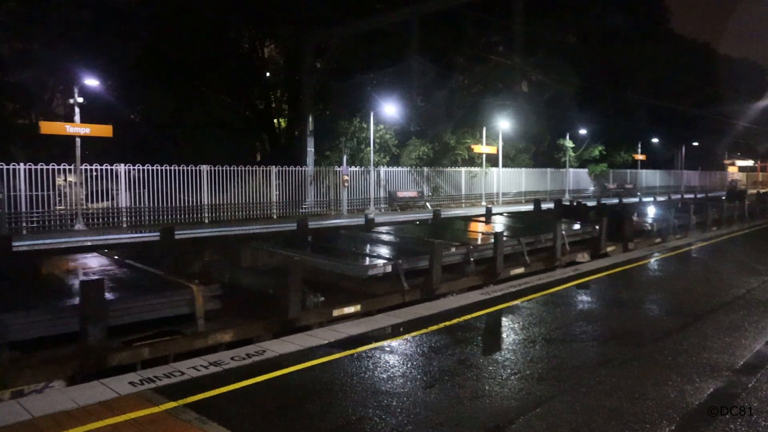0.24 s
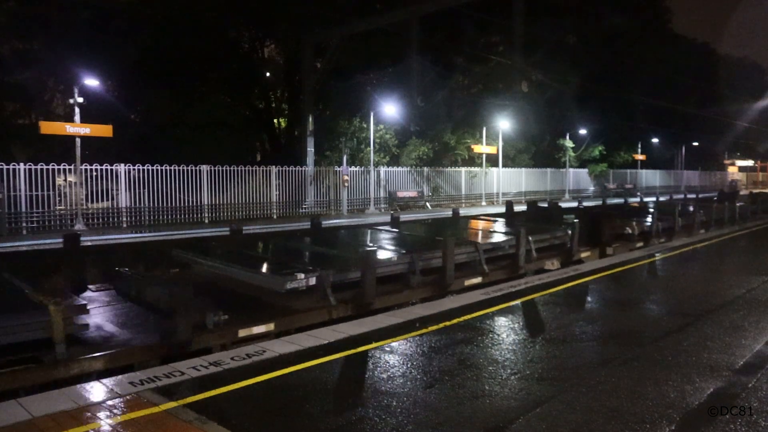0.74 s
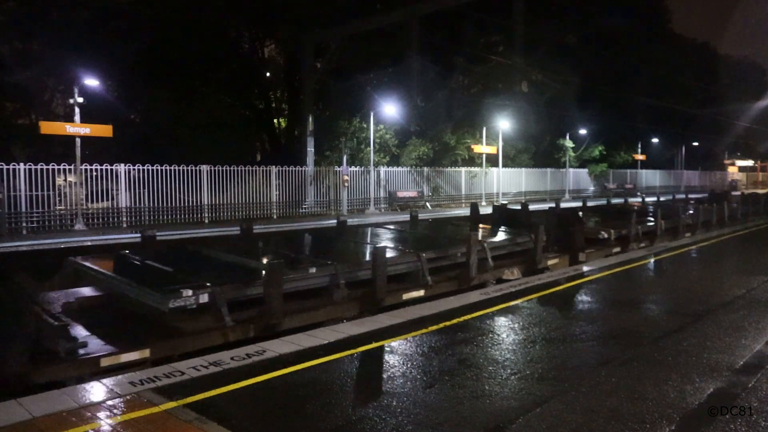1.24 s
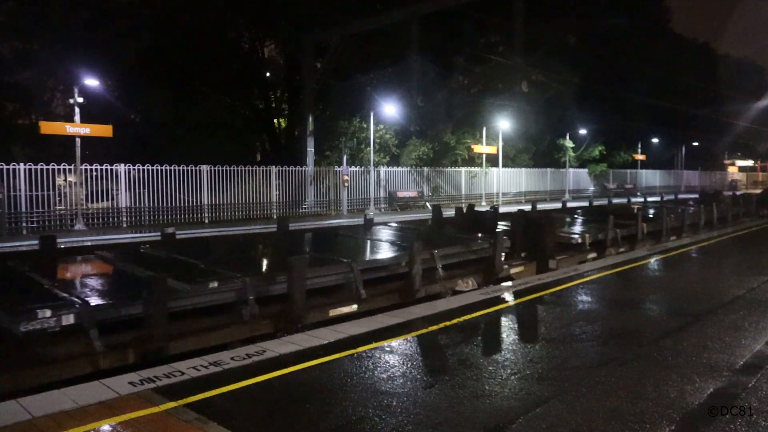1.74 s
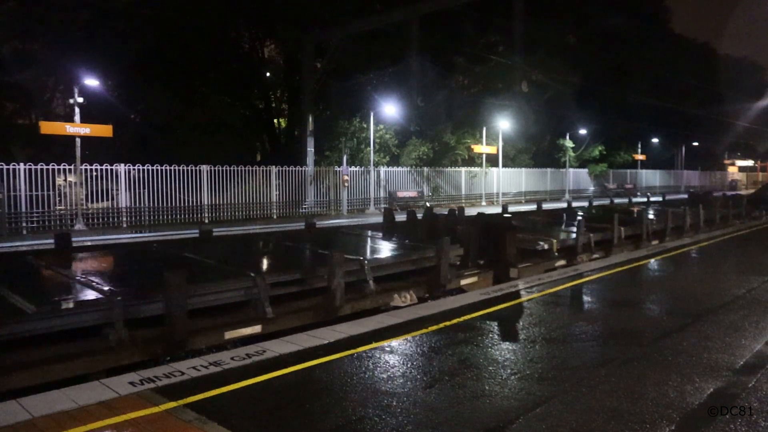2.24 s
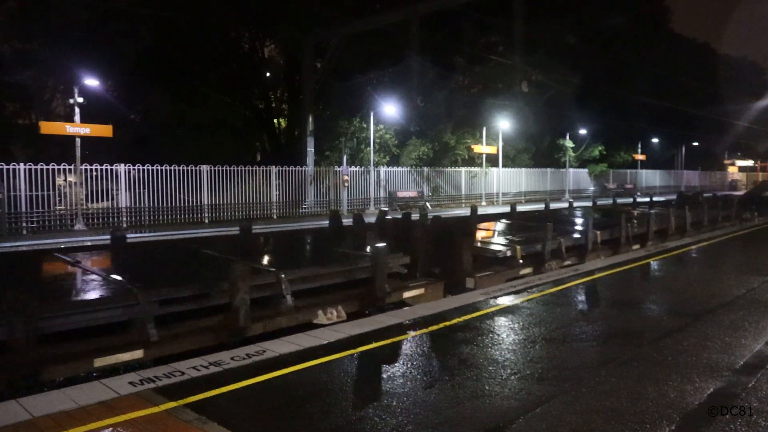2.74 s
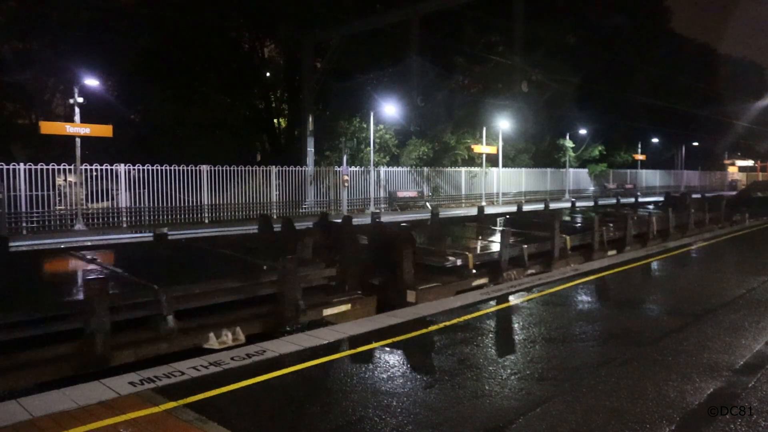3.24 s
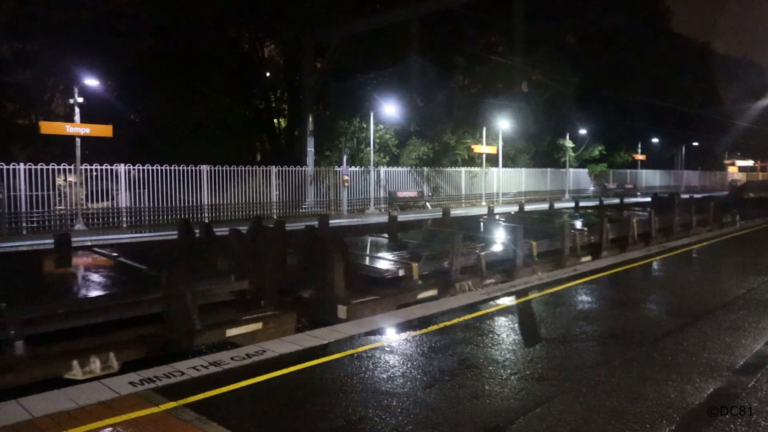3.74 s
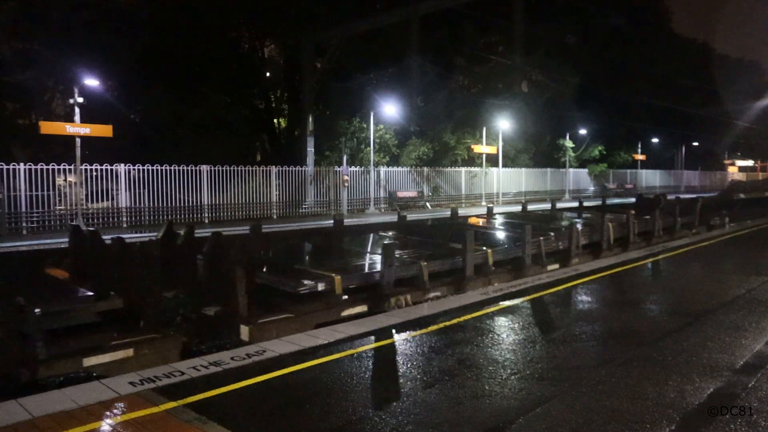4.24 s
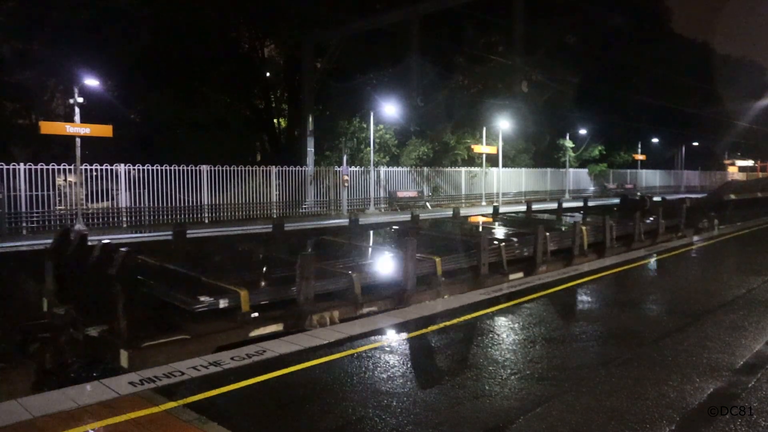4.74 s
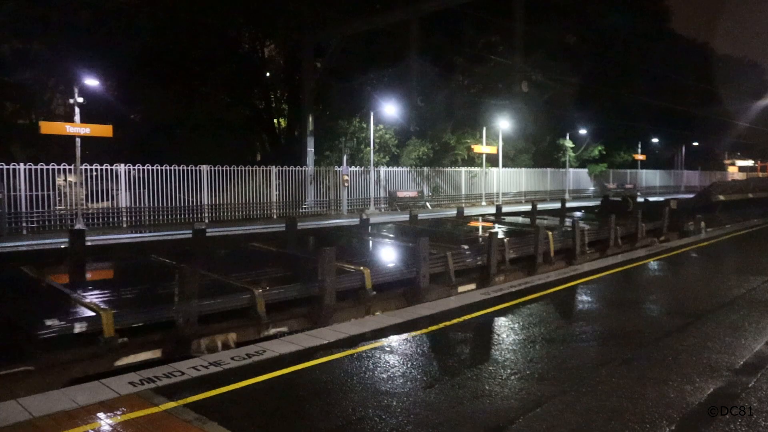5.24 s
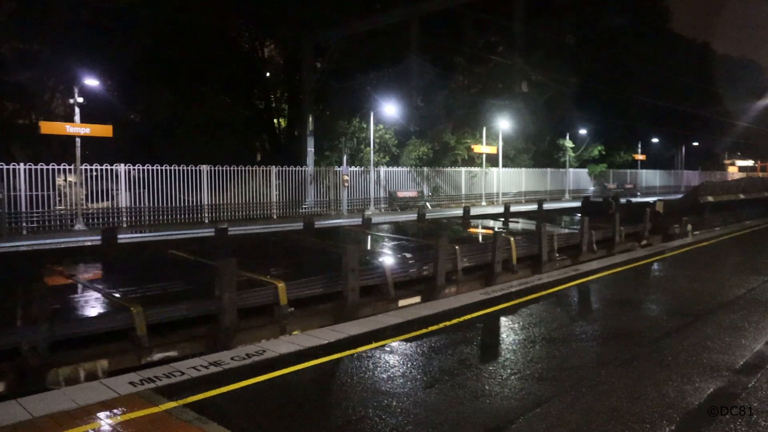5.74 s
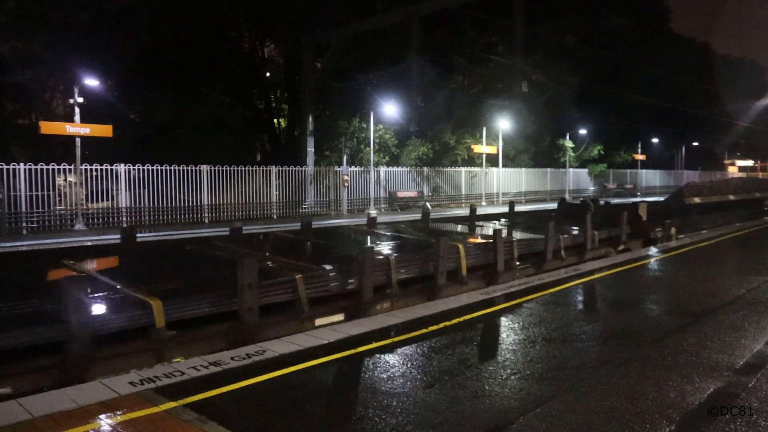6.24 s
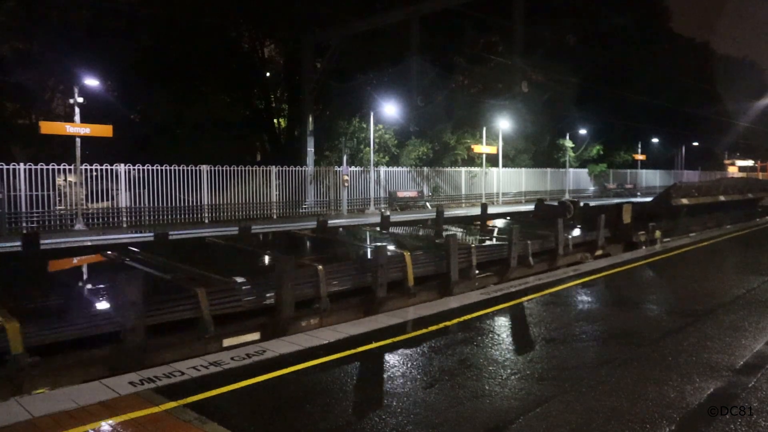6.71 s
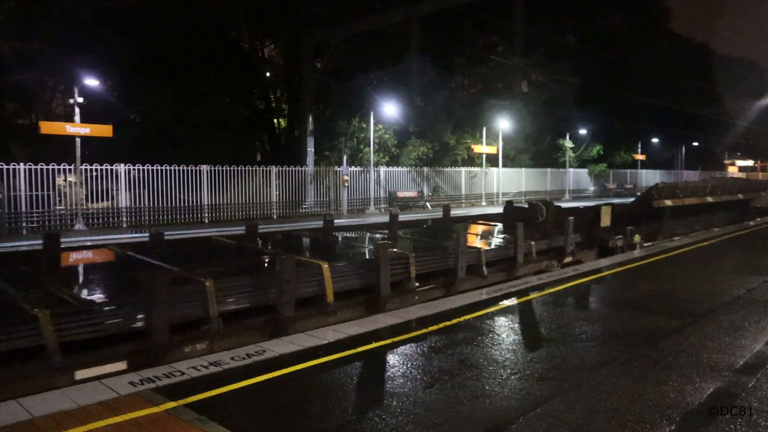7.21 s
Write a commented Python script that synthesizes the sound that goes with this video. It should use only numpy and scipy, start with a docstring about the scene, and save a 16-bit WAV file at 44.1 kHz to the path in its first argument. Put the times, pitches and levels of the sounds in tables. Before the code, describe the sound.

A freight train rolls past close by, steel wheels squealing and grinding over a steady low rumble, with a few thuds from rail joints.

```python
"""Freight train at a wet platform

Flat wagons roll slowly past at night, heard by one microphone. Rough rail makes them rumble
and rail joints make their frames thud. Flanges grind on the rail in bursts and shake the
wheel discs. Single wheels slip sideways and sing on one narrow mode for a while."""
import sys
import numpy as np
from scipy import signal
from scipy.io import wavfile

SR = 44100
rng = np.random.default_rng(int(sys.argv[2]) if len(sys.argv) > 2 else 0)


def to_wav(sig):
    """Store sig (one row per channel, or 1-D mono) as 16-bit WAV at the path in sys.argv[1].

    Samples outside -1..1 are clipped; the rate is SR.
    """
    pcm = np.clip(np.atleast_2d(sig), -1, 1) * 32767
    pcm = np.round(pcm).astype(np.int16)
    wavfile.write(sys.argv[1], SR, pcm.T)  # frames by channels


N = 329426


def from_db(db):
    return 10 ** (np.asarray(db) / 20)


def unit_rms(x):
    return x / np.sqrt(np.mean(np.abs(x) ** 2) + 1e-20)


def envelopes(rows):
    """One per-sample curve for each column after t/s."""
    times_s, *columns = np.transpose(rows)
    return [np.interp(np.arange(N) / SR, times_s, column) for column in columns]


def level_at(spectrum, hz):
    """Level in dB, interpolated over log frequency."""
    points_hz, levels_db = np.transpose(spectrum)
    return np.interp(np.log(hz), np.log(points_hz), levels_db)


def drift(rate_hz, size=N):
    """Slow noise of unit RMS: double one-pole low-pass at every 40th sample."""
    hop, settle = 40, 500
    r = np.exp(-2 * np.pi * rate_hz * hop / SR)
    noise = rng.standard_normal(size // hop + settle + 2)
    slow = signal.lfilter([1], [1, -2 * r, r * r], noise)[settle:]
    return np.interp(np.arange(size) / hop, np.arange(len(slow)), unit_rms(slow))


def resonance(x, hz, width_hz):
    """Two-pole resonance, unity peak gain."""
    r, w = np.exp(-np.pi * width_hz / SR), 2 * np.pi * hz / SR
    gain = (1 - r * r) / 2
    return signal.lfilter([gain, 0, -gain], [1, -2 * r * np.cos(w), r * r], x)


def flickering_bands(noises, spectrum, flicker_db, slow_db):
    """Third-octave (hz, band) pairs from two noises in turn, each flickering partly on its own."""
    bottom_hz, top_hz = spectrum[0][0], spectrum[-1][0]
    edges_hz = np.geomspace(bottom_hz, top_hz, 1 + round(3 * np.log2(top_hz / bottom_hz)))
    common = drift(17.3)
    for k, (low_hz, high_hz) in enumerate(zip(edges_hz, edges_hz[1:])):
        bandpass = signal.butter(2, [low_hz, high_hz], "band", fs=SR, output="sos")
        hz = np.sqrt(low_hz * high_hz)
        waver_db = flicker_db * (0.78 * common + drift(11.0)) + slow_db * drift(1.1)
        yield hz, from_db(level_at(spectrum, hz) + waver_db) * signal.sosfilt(bandpass, noises[k % 2])


def three_ranges(parts, low_hz, high_hz):
    """Sum (hz, signal) pairs into low, middle and high ranges, each of unit RMS."""
    low = sum(part for hz, part in parts if hz < low_hz)
    middle = sum(part for hz, part in parts if low_hz <= hz < high_hz)
    high = sum(part for hz, part in parts if hz >= high_hz)
    return unit_rms(low), unit_rms(middle), unit_rms(high)


# Rolling noise spectrum: f/Hz, relative density/dB
RUMBLE_SPECTRUM = [(12, -50), (20, -1), (32, -27), (66, 0.5), (129, 3), (171, -5.5), (249, -0.5), (393, -7),
                   (487, -9), (573, -13.5), (1000, -17), (1300, -17)]
# Wagon bodies and track: t/s, deep level/dB, upper level/dB
RUMBLE_LEVELS = [(0.0, -22, -30), (0.06, -31.5, -27), (0.73, -27, -27.5), (0.78, -20.5, -23.5),
                 (0.9, -27, -27), (1.3, -27.5, -26), (1.36, -28, -20), (1.45, -26.5, -25),
                 (2.18, -26.5, -25.5), (2.31, -20.5, -24), (2.58, -30.5, -25), (2.62, -17.5, -25.5),
                 (2.79, -25, -25), (2.87, -18, -17.5), (3.16, -28.5, -29.5), (3.27, -25, -23.5),
                 (3.33, -31, -32), (3.74, -36, -33.5), (4.18, -29, -33.5), (4.22, -22.5, -26),
                 (4.33, -29.5, -30.5), (5.68, -33, -34.5), (5.84, -35.5, -36.5), (7.14, -31, -32.5),
                 (7.47, -27.5, -35.5)]
# Roar above the rumble: t/s, level/dB
ROAR_LEVELS = [(0.0, -30), (0.08, -29), (2.18, -30.5), (2.68, -28.5), (2.85, -29), (2.87, -24), (3.7, -37),
               (4.74, -29), (4.76, -31.5), (5.82, -38.5), (6.32, -34.5), (6.82, -38.5), (7.18, -33.5),
               (7.47, -36.5)]


def wagon_rumble():
    """Rough rail shakes the wagons; three ranges swell separately."""
    deep_db, upper_db = envelopes(RUMBLE_LEVELS)
    roar_db, = envelopes(ROAR_LEVELS)
    noises = rng.standard_normal((2, N))
    parts = list(flickering_bands(noises, RUMBLE_SPECTRUM, flicker_db=1.2, slow_db=0.4))
    deep, upper, roar = three_ranges(parts, low_hz=200, high_hz=420)
    return from_db(deep_db) * deep + from_db(upper_db) * upper + from_db(roar_db) * roar


# Wheel over a rail joint: t/s, level/dB
JOINT_BLOWS = [(0.776, -10), (1.361, -5), (2.329, 0), (2.629, -18), (2.876, 8.5), (3.261, -5), (4.218, -16)]
# Wagon frame modes: f/Hz, gain/dB, T60/s
FRAME_MODES = [(84, -44, 0.095), (143, -19, 0.1), (186, -14.5, 0.09), (260, -19.5, 0.018),
               (400, -25, 0.044)]


def joint_thuds():
    """Each blow rings the frame briefly, with new mode strengths every time."""
    times_s, blow_db = np.transpose(JOINT_BLOWS)
    onsets = np.round(times_s * SR).astype(int)
    scatter_db = rng.normal(0, 1.5, (len(onsets), len(FRAME_MODES)))
    out = np.zeros(N)
    for k, (hz, gain_db, t60_s) in enumerate(FRAME_MODES):
        blows = np.full(N, 1e-18)
        blows[onsets] = from_db(blow_db + gain_db + scatter_db[:, k])
        r, w = from_db(-60 / (t60_s * SR)), 2 * np.pi * hz / SR
        out += signal.lfilter([0, np.sin(w)], [1, -2 * r * np.cos(w), r * r], blows)
    return out


# Broad friction spectrum: f/Hz, relative density/dB
GRIND_SPECTRUM = [(750, -43), (1000, -35), (1330, -10), (1470, 0), (1900, -3.5), (2300, -5.5), (3500, -0.5),
                  (4350, 2), (5400, 1.5), (6300, -8), (8600, 1), (9800, -11.5), (12000, -13.5),
                  (14000, -23), (16300, -43)]
# Wheel disc modes: f/Hz, width/Hz, level over the broad spectrum/dB
DISC_MODES = [(1200, 34, 22), (1576, 89, 4.5), (3190, 1000, 6), (3753, 99, 10), (4646, 140, 8),
              (4835, 93, 4), (5123, 150, 9.5), (5500, 290, 9)]
# Flange pressing on the rail: t/s, grind level/dB, growl relative to grind/dB
FLANGE_BURSTS = [(0.0, -19, -7), (1.05, -20.5, -4.5), (1.32, -23.5, -4.5), (1.65, -22, -5.5),
                 (2.35, -22, -5.5), (2.915, -25, -4.5), (2.95, -18.5, -4.5), (3.14, -15, -7),
                 (3.32, -16.5, -11), (4.15, -17, -9), (4.3, -20, -11), (4.625, -22, -3.5),
                 (4.655, -16, -4.5), (5.95, -19, -6), (6.32, -25, -6), (6.95, -25, -2), (7.08, -19.5, -3.5),
                 (7.3, -20.5, -5.5), (7.47, -27, 0.5)]
# Treble fizz: t/s, level/dB
FIZZ_LEVELS = [(0.0, -26), (1.1, -25.5), (1.5, -22.5), (2.3, -27), (2.88, -29), (3.2, -25.5), (4.4, -29.5),
               (5.0, -23.5), (5.9, -29), (6.9, -28), (7.1, -26), (7.47, -35)]


def flange_grind(minor_modes=170):
    """Steel rubs on wet steel: broad noise, part of it ringing through the wheel discs."""
    grind_db, growl_db = envelopes(FLANGE_BURSTS)
    fizz_db, = envelopes(FIZZ_LEVELS)
    noises = rng.standard_normal((2, N))
    friction = rng.standard_normal(N)
    parts = list(flickering_bands(noises, GRIND_SPECTRUM, flicker_db=2.5, slow_db=0.25))
    for hz, width_hz, over_db in DISC_MODES:
        drive_db = over_db + 2 * drift(1.5)  # uneven as different wheels come near
        gain = from_db(level_at(GRIND_SPECTRUM, hz) + drive_db)
        parts.append((hz, gain * resonance(friction, hz, width_hz)))
    # Minor modes of many wheels flare and vanish, stronger in the treble and under hard grinding.
    pressure_db = 0.5 * (grind_db - grind_db.mean())
    for k, (shift, breadth) in enumerate(rng.random((minor_modes, 2))):
        position = ((k + shift) / minor_modes) ** 1.4  # denser at the low end
        hz, width_hz = 1100 + 14200 * position, 22 + 30 * breadth
        flare_db = 6 * np.minimum(drift(3.0), 1.3)
        drive_db = 1 + 13 * position + pressure_db + flare_db
        gain = from_db(level_at(GRIND_SPECTRUM, hz) + drive_db)
        parts.append((hz, (-1) ** k * gain * resonance(friction, hz, width_hz)))
    growl, grind, fizz = three_ranges(parts, low_hz=3000, high_hz=7000)
    return from_db(grind_db) * (grind + from_db(growl_db) * growl) + from_db(fizz_db) * fizz


# Singing wheels: start t/s, peak t/s, end t/s, f/Hz, peak level/dB
WHEEL_TONES = [(0.0, 0.7, 1.2, 1600, -31), (0.0, 0.3, 0.6, 4800, -30), (0.0, 0.1, 0.2, 4605, -29),
               (0.3, 0.46, 0.51, 4605, -25.5), (0.1, 0.8, 1.15, 5540, -32), (0.54, 0.62, 0.7, 4595, -25),
               (0.68, 0.74, 0.95, 4600, -27), (0.74, 0.84, 1.05, 4785, -27.5), (0.74, 0.82, 0.9, 3730, -31),
               (1.04, 1.15, 1.33, 4592, -25.5), (1.0, 1.42, 1.75, 4598, -27),
               (1.57, 1.67, 1.75, 4595, -26.5), (1.8, 2.0, 2.15, 4598, -33), (2.22, 2.31, 2.45, 4600, -30),
               (0.0, 0.95, 1.2, 8495, -25.5), (0.2, 0.7, 1.7, 11520, -37), (0.22, 0.67, 1.1, 7320, -34),
               (1.0, 1.6, 3.0, 12260, -37), (1.25, 1.65, 2.1, 9050, -31), (1.25, 2.29, 2.5, 10520, -26),
               (1.2, 2.6, 3.15, 8080, -29), (1.78, 2.22, 3.2, 11510, -33), (2.2, 2.84, 3.0, 3430, -30.5),
               (2.63, 3.05, 3.3, 2790, -33), (2.87, 3.11, 3.78, 3780, -30), (2.93, 2.98, 3.06, 4545, -22.5),
               (3.05, 3.11, 3.18, 4535, -16), (3.2, 3.75, 4.35, 4545, -23.5), (3.16, 3.2, 3.3, 4590, -25),
               (2.97, 3.19, 4.1, 13000, -32), (2.97, 3.3, 4.0, 11390, -35), (3.0, 3.5, 4.0, 5225, -25),
               (3.05, 3.1, 3.18, 5235, -21), (3.13, 3.21, 3.29, 5232, -16.5),
               (3.27, 3.35, 3.43, 5228, -14.5), (3.43, 3.49, 3.56, 5226, -20), (3.1, 3.27, 4.1, 10550, -35),
               (3.1, 3.55, 4.3, 6460, -28), (3.12, 3.4, 4.38, 9680, -37), (3.15, 3.71, 3.9, 8650, -32),
               (3.2, 3.35, 3.95, 5790, -27), (3.24, 3.62, 3.92, 6960, -32), (3.37, 3.42, 3.52, 4548, -21),
               (3.53, 3.6, 3.65, 4555, -21), (3.64, 3.69, 3.8, 4552, -17), (3.84, 3.89, 4.04, 4545, -24),
               (4.04, 4.09, 4.14, 4541, -22), (4.16, 4.21, 4.24, 4541, -23),
               (3.54, 3.67, 3.74, 5250, -18.5), (3.72, 3.77, 3.9, 5260, -24), (4.0, 4.09, 4.16, 5241, -25),
               (3.71, 3.9, 4.62, 3700, -31), (3.9, 4.2, 4.53, 7470, -32), (4.23, 4.32, 4.6, 4594, -21),
               (4.04, 4.15, 4.3, 14200, -43), (4.68, 4.95, 5.45, 5550, -28), (6.2, 6.95, 7.4, 5550, -36),
               (4.45, 5.0, 5.4, 13220, -31), (4.62, 4.81, 5.5, 1610, -31), (5.3, 5.9, 6.3, 1620, -32),
               (4.6, 4.72, 5.0, 1170, -34), (4.64, 4.7, 5.0, 2690, -28), (4.64, 4.8, 5.05, 3720, -29),
               (4.66, 4.95, 5.1, 3410, -29), (4.62, 4.95, 5.9, 2930, -28), (4.73, 4.95, 6.12, 6160, -32),
               (4.7, 5.4, 5.95, 10855, -28.5), (5.7, 6.15, 6.36, 10852, -25),
               (4.77, 5.22, 6.29, 10300, -32), (4.79, 5.29, 5.51, 5340, -28), (4.95, 5.13, 5.5, 8505, -24),
               (5.02, 5.28, 6.03, 8250, -33), (4.95, 5.09, 5.17, 9286, -31), (5.15, 5.42, 5.72, 9287, -22),
               (5.6, 5.73, 5.84, 9287, -20.5), (5.74, 5.93, 6.33, 9277, -24.5),
               (5.17, 5.27, 5.45, 4750, -24), (5.17, 5.25, 5.35, 4560, -25), (5.4, 5.75, 6.3, 4750, -25),
               (5.6, 5.75, 6.0, 4630, -27), (5.31, 5.75, 6.26, 7860, -33), (5.45, 5.68, 6.21, 13920, -39),
               (5.49, 5.85, 6.3, 11340, -34), (5.7, 7.27, 7.48, 12245, -36), (6.29, 6.8, 6.97, 7620, -37),
               (6.3, 6.88, 7.43, 11240, -37), (7.0, 7.15, 7.41, 10300, -36),
               (7.05, 7.15, 7.6, 10845, -29.5), (7.07, 7.22, 7.45, 9270, -26.5)]


def wheel_squeals(wander_hz=33, edge_db=-9.5, chirp_s=0.3, shrill_hz=6000, loud_db=-30):
    """Stick-slip feeds one mode per tone; it swells and dies while amplitude and phase wander."""
    out = np.zeros(N)
    for start_s, peak_s, end_s, hz, level_db in WHEEL_TONES:
        first, stop = max(round(start_s * SR), 0), min(round(end_s * SR), N)
        t = np.arange(first, stop) / SR
        length_s = end_s - start_s
        # Loud shrill tones and short lower chirps lock on their mode and waver less.
        locked = level_db > loud_db if hz > shrill_hz else length_s < chirp_s
        steady = 1.6 if locked else 0.9
        phasor = steady + drift(wander_hz, len(t)) + 1j * drift(wander_hz, len(t))
        tone = np.sqrt(2) * np.real(unit_rms(phasor) * np.exp(2j * np.pi * hz * t))
        swell_db = np.interp(t, [start_s, peak_s, end_s], [edge_db, 0, edge_db])
        flutter_db = 2 * drift(9.6, len(t))
        fade_s = 0.03 + 0.012 * length_s
        fade = np.clip(np.minimum(t - start_s, end_s - t) / fade_s, 0, 1)
        out[first:stop] += from_db(level_db + swell_db + flutter_db) * fade * tone
    return out


def scene():
    """One microphone, sent to both channels."""
    mono = wagon_rumble() + joint_thuds() + flange_grind() + wheel_squeals()
    return np.stack([mono, mono])


def record(dry, low_cut_hz=30, high_cut_hz=15690, ceiling=0.93):
    """The microphone loses the deepest bass; peaks are rounded and the top is cut."""
    highpass = signal.butter(2, low_cut_hz, "high", fs=SR, output="sos")
    lowpass = signal.ellip(14, 0.3, 75, high_cut_hz, fs=SR, output="sos")
    thinned = signal.sosfilt(highpass, dry)
    rounded = thinned / (1 + np.abs(thinned / ceiling) ** 6) ** (1 / 6)
    return signal.sosfilt(lowpass, rounded)


dry = scene()
out = record(dry)
to_wav(out)
```